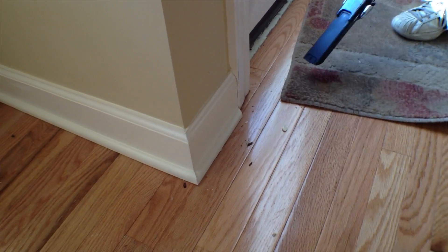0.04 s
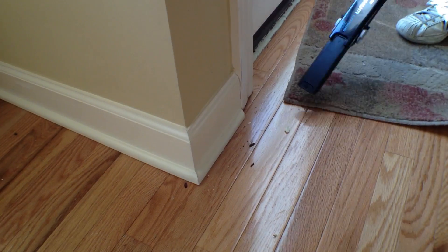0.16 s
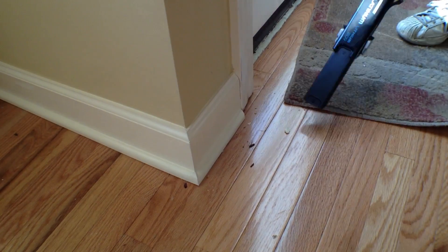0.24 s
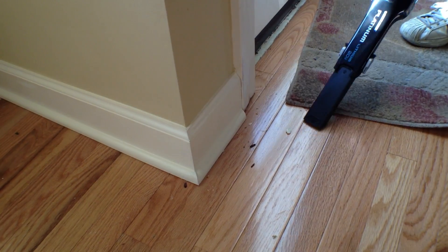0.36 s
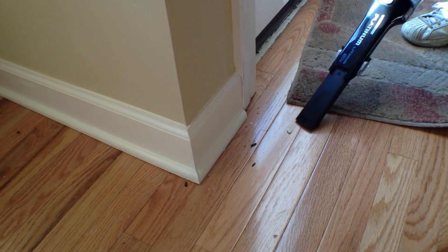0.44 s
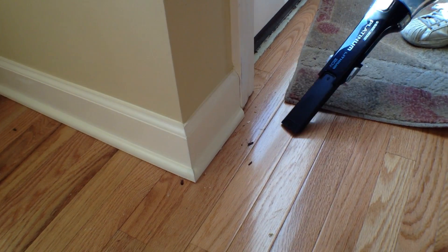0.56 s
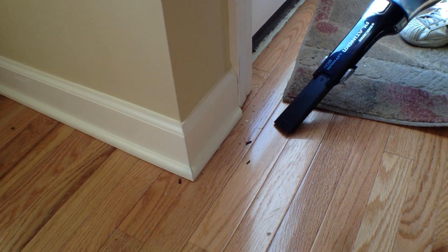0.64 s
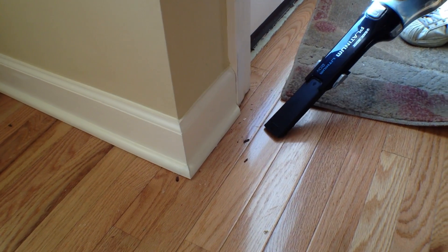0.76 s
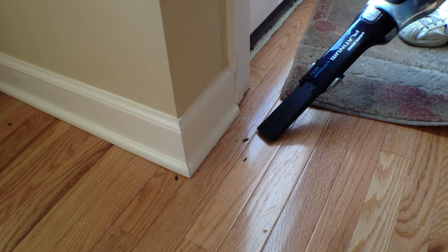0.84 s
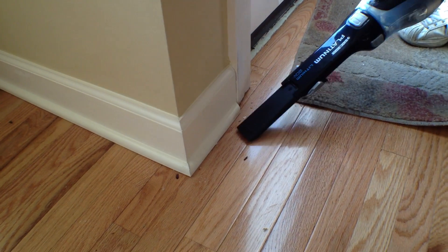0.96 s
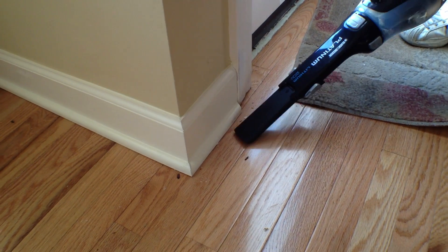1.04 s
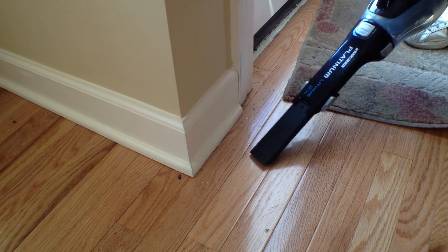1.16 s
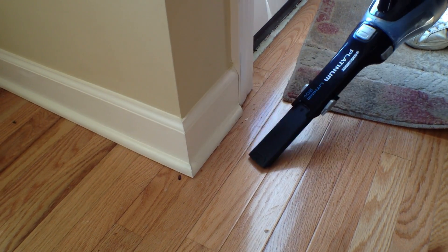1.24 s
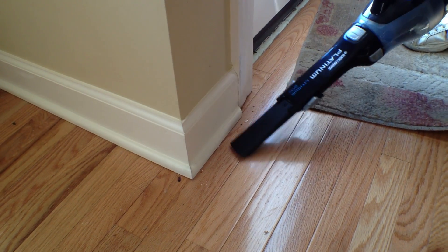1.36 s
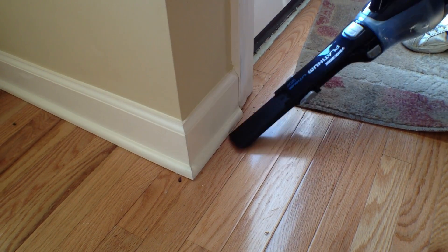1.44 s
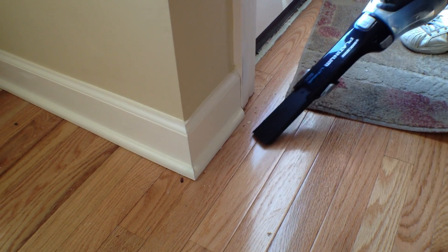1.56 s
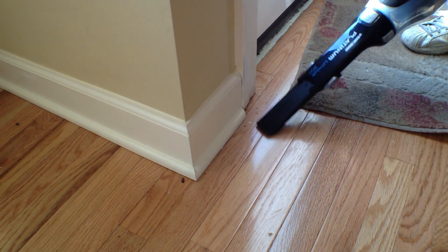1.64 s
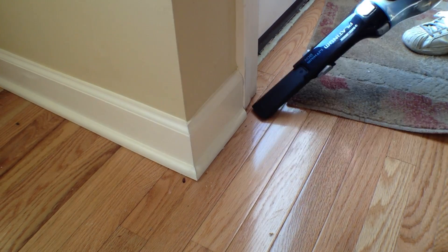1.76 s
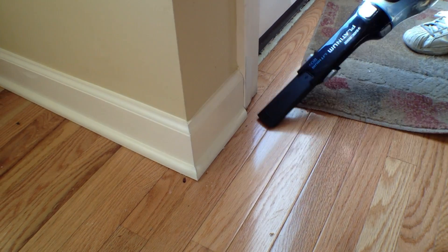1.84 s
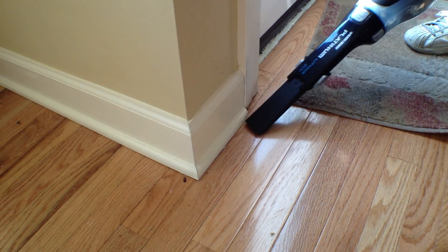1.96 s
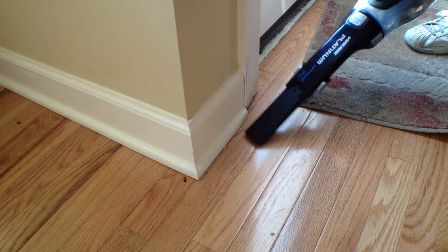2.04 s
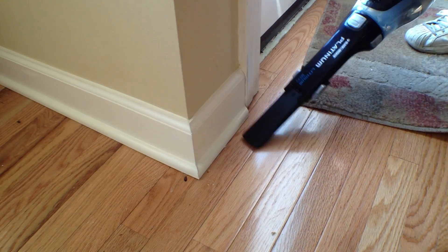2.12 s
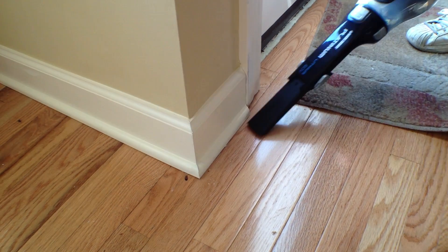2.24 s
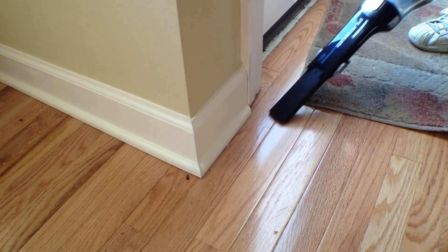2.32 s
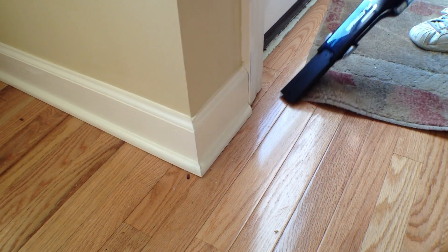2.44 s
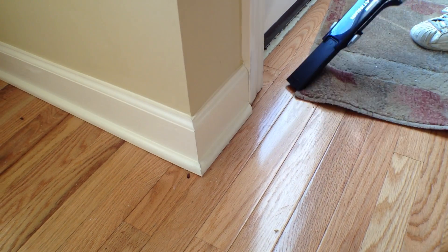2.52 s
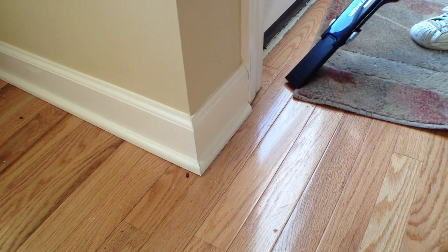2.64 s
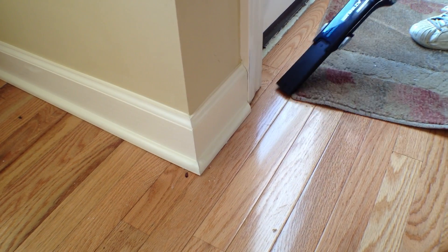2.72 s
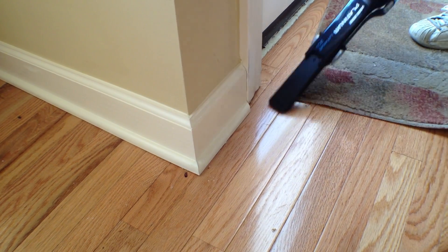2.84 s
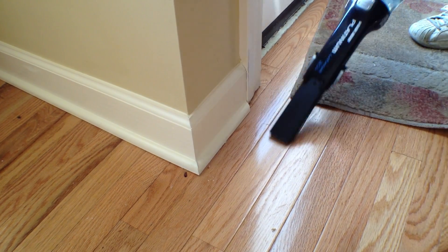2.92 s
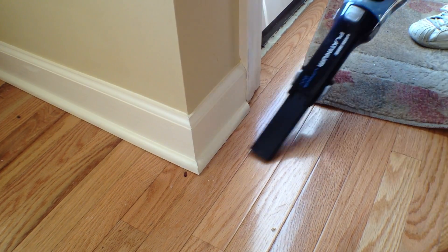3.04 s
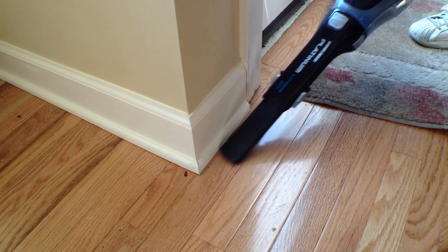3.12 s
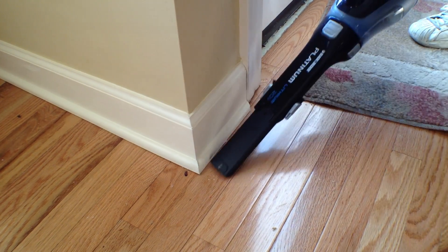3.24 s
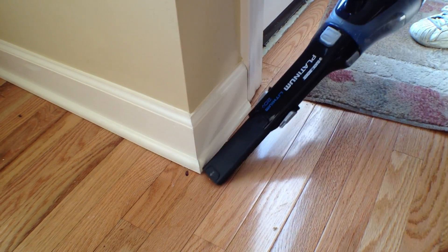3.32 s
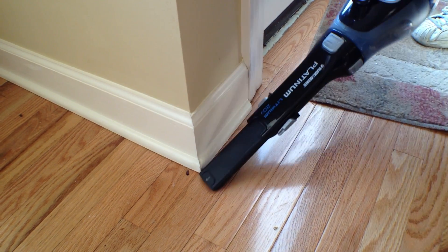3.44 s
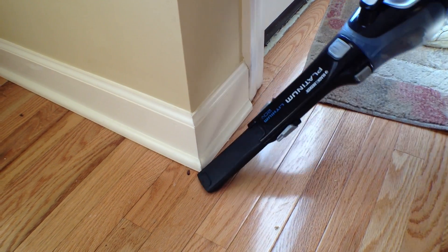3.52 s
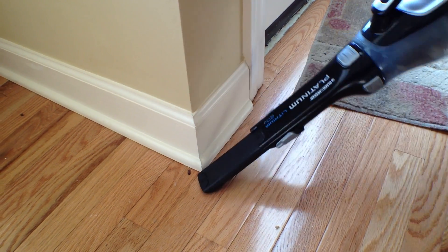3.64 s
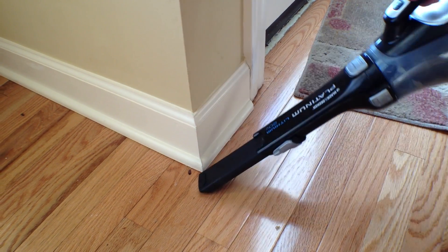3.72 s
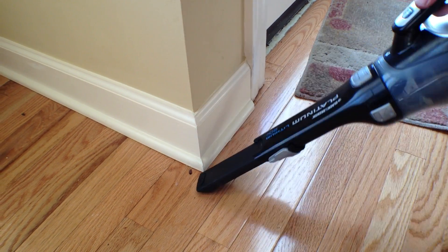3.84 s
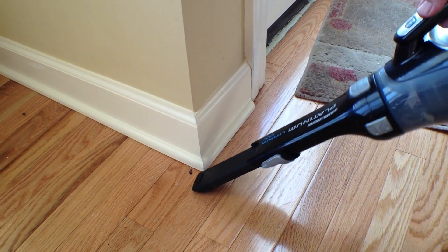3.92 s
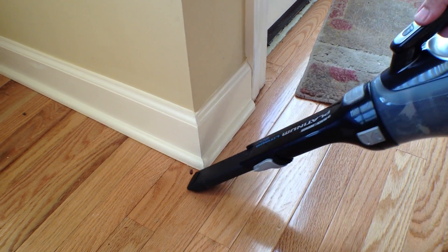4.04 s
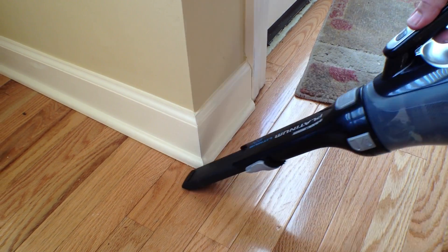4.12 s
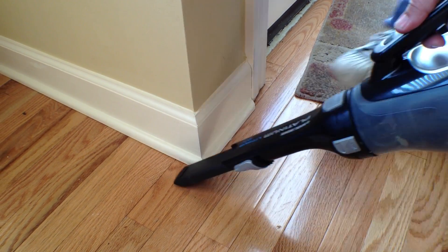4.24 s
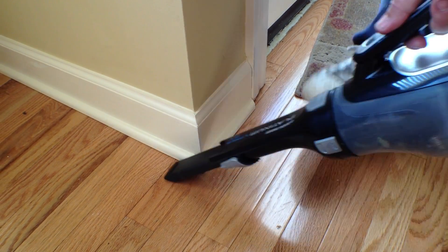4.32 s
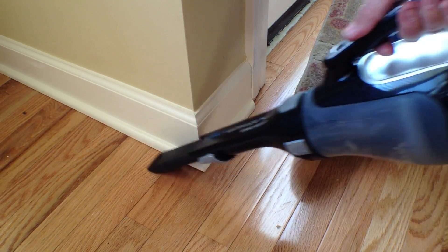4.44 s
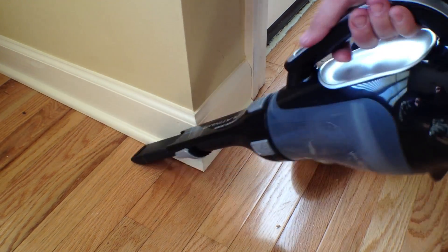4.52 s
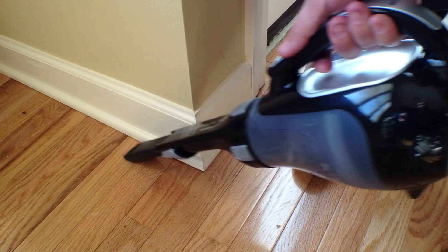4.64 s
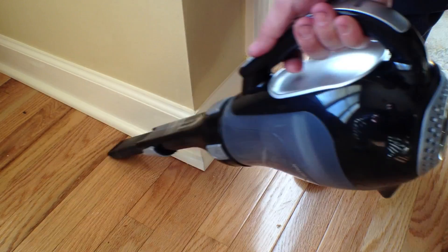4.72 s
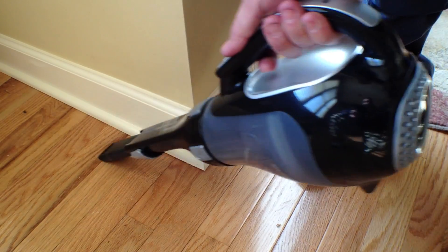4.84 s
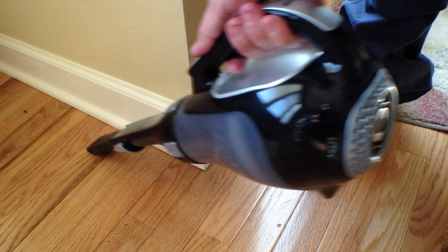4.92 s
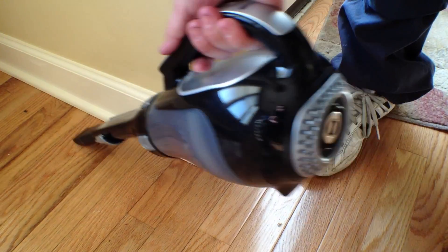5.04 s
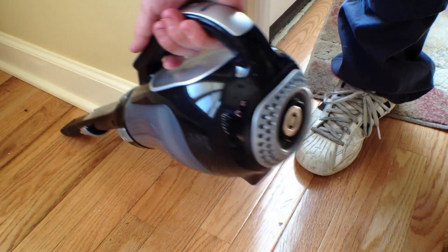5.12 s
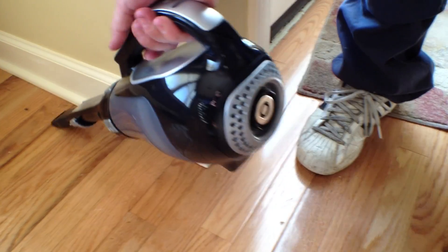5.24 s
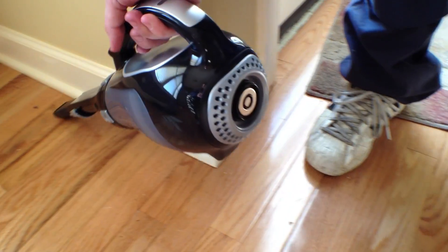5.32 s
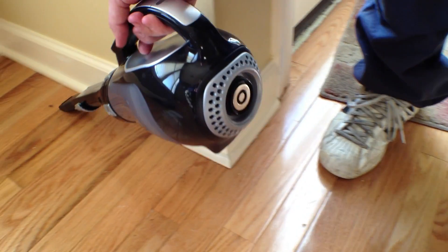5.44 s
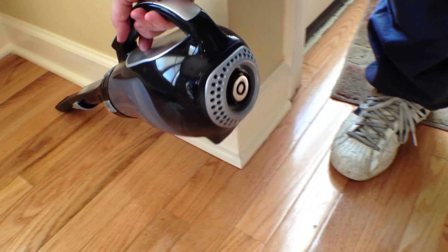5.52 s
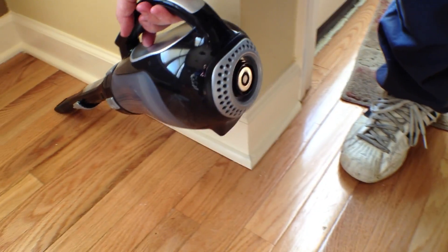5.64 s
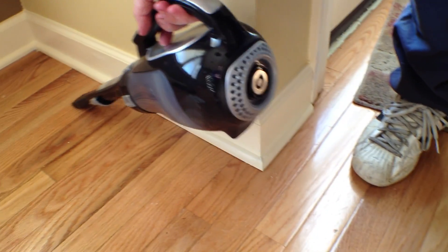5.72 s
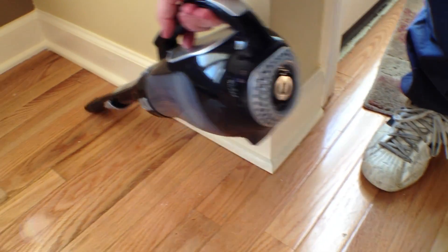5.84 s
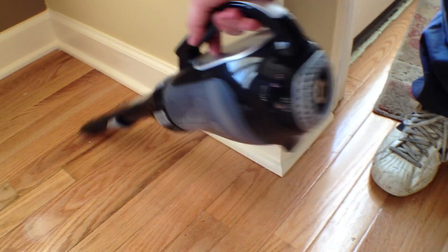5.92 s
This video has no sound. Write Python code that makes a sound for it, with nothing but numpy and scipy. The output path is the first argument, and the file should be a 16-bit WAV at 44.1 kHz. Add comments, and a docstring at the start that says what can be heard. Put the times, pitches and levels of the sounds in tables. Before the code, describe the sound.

Continuous small-vacuum noise indoors, heard by one fixed-sounding mono microphone. Turbulent air dominates, with a steady motor hum and a piercing whine that swells and fades in flutters. Early on come a soft knock and tiny ticks, then another knock. Later the machine approaches, getting louder, brighter and fuller, with one sharp clatter of grit up the nozzle and a lone tick near the end.

```python
"""A cordless hand vacuum is steered over a wooden floor, far from the microphone at first, then close and tail first.
Its motor hums and its nine-bladed fan whines: periodic tones locked to the shaft, shaken by unsteady air.
Air rushes through the housing and the exhaust slots: turbulent noise shaped by resonances and a floor echo.
Crumbs tick up the nozzle and ring its plastic; the nozzle now and then bumps the floor with a dull knock.
A steady low drone of the room lies beneath."""
import sys
import numpy as np
from scipy import signal
from scipy.fft import rfft, irfft
from scipy.io import wavfile
from scipy.ndimage import uniform_filter1d

SR = 44100
rng = np.random.default_rng(int(sys.argv[2]) if len(sys.argv) > 2 else 0)


def wrap_up_sound(samples):
    """Save the sound to the file named by the first command line argument, as 16-bit audio."""
    columns = np.atleast_2d(samples).T
    # keep every value between -1 and 1, then stretch to whole-number steps
    tamed = np.clip(columns, -1, 1)
    steps = np.round(tamed * 32767).astype(np.int16)
    wavfile.write(sys.argv[1], SR, steps)


N = 263277
T = np.arange(N) / SR
FRAME, HOP = 2048, 512  # short-time spectrum, samples
FRAME_S = np.arange(N // HOP + 5) * HOP / SR
BIN_HZ = np.fft.rfftfreq(FRAME, 1 / SR)

# pose of the machine; facing is how far the exhaust points at the microphone:
# time_s, closeness (0-1), facing (0-1), floor_echo_lag_ms, floor_echo_strength (0-1)
POSE = [(0, 0, 0, 0.9, 0.06), (.6, 0.11, 0.03, 0.71, .07), (1.2, 0.21, .14, 0.73, 0.07),
        (2, 0.07, 0.11, 0.81, 0), (2.7, 0.18, 0.05, 0.59, 0.4), (3.25, 0, 0, 0.75, 0),
        (3.6, 0.24, 0.17, 1.16, 0.3), (3.9, 0.53, 0, 1.6, 0.03), (4.3, 1, 0.38, 1.7, 0.3),
        (4.8, 0.7, 0.48, 1.83, 0.05), (5.2, 0.97, 0.97, 2.05, 0), (5.97, 0.91, 0.84, 1.6, 0.02)]
# rush of air at the microphone, before a common trim: time_s, level_db
RUSH_LEVEL = [(0, -51.5), (.3, -49), (1.2, -47), (2.2, -47.5), (2.7, -49), (3.3, -46.5), (4.5, -42),
              (5.3, -39.5), (5.97, -42)]


def amp(db):
    """Level law: decibels to an amplitude ratio."""
    return 10 ** (np.asarray(db) / 20)


def evened(x):
    """Power normalization: scales to rms 1."""
    return x / np.sqrt(np.mean(x ** 2) + 1e-20)


def follow(rows, t):
    """Linear interpolation in time: the columns of a curve table at the times t."""
    s, *columns = np.transpose(rows)
    return [np.interp(t, s, c) for c in columns]


def read(points, hz):
    """Interpolation on a logarithmic frequency axis: the levels of a spectrum table at hz."""
    f, db = np.transpose(points)
    return np.interp(np.log(hz + 1), np.log(f + 1), db)


def add(mix, s, sound):
    """Superposition: mixes a sound in at time s."""
    part = mix[round(s * SR):][:len(sound)]
    part += sound[:len(part)]


def wander(rate_hz):
    """Low-pass random fluctuation of rms 1, mostly slower than the rate."""
    hz = np.fft.rfftfreq(N, 1 / SR)
    spectrum = rfft(rng.standard_normal(N)) / (1 + (hz / rate_hz) ** 2)
    return evened(irfft(spectrum, N))


def sway(rate_hz):
    """Band-pass random fluctuation of rms 1 at about the rate, with slow drift suppressed."""
    u = np.fft.rfftfreq(N, 1 / SR) / rate_hz
    spectrum = rfft(rng.standard_normal(N)) * u ** 2 / (1 + u ** 4)
    return evened(irfft(spectrum, N))


def noise(gain):
    """Time-varying filtering: noise of rms 1 whose short-time spectrum follows gain (frames x bins)."""
    a, b = rng.standard_normal((2, len(FRAME_S), len(BIN_HZ)))
    spectrum = ((a + 1j * b) * gain).T
    return evened(signal.istft(spectrum, nperseg=FRAME, noverlap=FRAME - HOP)[1][:N])


def patches(size):
    """Local averaging: random values of rms 1 correlated over patches of size (frames, bins)."""
    z = rng.standard_normal((len(FRAME_S), len(BIN_HZ)))
    along_time = uniform_filter1d(z, size[0], axis=0)
    return evened(uniform_filter1d(along_time, size[1], axis=1))


def grain(eddy_db, ripple_db):
    """Brief wide eddies, and narrow ridges from the room's standing waves that shift as the machine moves."""
    eddies = eddy_db * patches(size=(6, 16))
    ripples = ripple_db * patches(size=(45, 2))
    return amp(eddies + ripples)


def bell(hz, width):
    """Resonance curve: 1 at its centre, a half at the edges of its width."""
    return 1 / (1 + (2 * (BIN_HZ - hz) / width) ** 2)


def posed(far_db, close_db, facing_db):
    """Distance and directivity: the level of a part as it comes closer and turns its tail to the microphone."""
    close, facing = follow(POSE, T)[:2]
    return far_db + close_db * close + facing_db * facing


def room():
    """Stationary coloured noise: a low drone that does not change with the vacuum's distance."""
    # colour of the drone, before levelling: frequency_hz, relative_db
    drone = [(25, -48), (60, -42), (85, -30), (120, -14.5), (155, -1.5), (195, 3), (225, -1), (270, 3),
             (320, -15.5), (390, -1), (600, -4), (2000, -50)]
    level_db = -63  # rms
    hz = np.fft.rfftfreq(N, 1 / SR)
    spectrum = rfft(rng.standard_normal(N)) * amp(read(drone, hz))
    return amp(level_db) * evened(irfft(spectrum, N))


def bumps():
    """Impact: a short, dull band-limited knock of plastic on boards with a brief scatter of reflections."""
    # nozzle bumping the floor: start_s, peak_db, pitch_hz
    knocks = [(.411, -41, 965), (0.42, -48, 220), (2.212, -39, 690), (4.556, -45.5, 219), (4.585, -48, 206)]
    out, t = np.zeros(N), np.arange(SR // 4) / SR
    for s, peak_db, hz in knocks:
        push = 0.012 * rng.standard_normal(len(t)) * amp(-60 * t / 0.15)  # scatter, t60 0.15 s
        push[0] = 1  # the blow itself
        band = signal.butter(3, [hz / 1.45, hz * 1.45], "band", fs=SR, output="sos")
        knock = signal.sosfilt(band, push)
        add(out, s, amp(peak_db) * knock / abs(knock).max())
    return out


def crumbs():
    """Impact and modal ringing: each crumb cracks on the wall, rings the nozzle and skitters on, without bass."""
    # crumbs striking the inside of the nozzle: start_s, strike_level_db
    strikes = [(.627, -35.5), (.639, -41), (.661, -42), (1.840, -38.5), (4.588, -34), (4.596, -29),
               (4.6056, -21), (4.610, -27.5), (4.620, -35), (5.1204, -33)]
    # ring of the plastic nozzle, each pitch raised at random by up to 4 %: frequency_hz, level_db, t60_s
    plastic = [(1420, -8, .015), (3030, -5, 0.025), (7600, 4, 0.023), (8670, 5.5, 0.0098),
               (9260, -15, 0.0095), (10800, 10, 0.0047), (11000, -7, 0.0034), (12300, -8, .007),
               (14200, -23, .006)]
    out, t = np.zeros(N), np.arange(SR // 8) / SR
    soften = signal.butter(1, 8000, "low", fs=SR, output="sos")
    for s, strike_db in strikes:
        ring = np.zeros(len(t))
        for hz, db, t60 in plastic:
            cycles = hz * rng.uniform(1.0, 1.04) * t + rng.random()
            ring += amp(db - 60 * t / t60) * np.sin(2 * np.pi * cycles)
        crack = signal.sosfilt(soften, rng.standard_normal(len(t)) * amp(-60 * t / .016))
        blow = .85 * ring / abs(ring).max() + .6 * crack / abs(crack).max()
        struck = rng.random(len(t)) < 1500 / SR  # about 1500 small hits a second, dying away
        hits = .1 * rng.standard_normal(len(t)) * struck * amp(-60 * t / .13)
        hits[0] = 1  # the first strike
        add(out, s, amp(strike_db) * signal.fftconvolve(hits, blow)[:len(t)])
    # so small a blow radiates no bass
    return signal.sosfilt(signal.butter(3, 550, "high", fs=SR, output="sos"), out)


def jets():
    """Jet noise: air leaving the slots makes a fuzzy, fluttering whistle, higher on axis, that sways with the hand."""
    # resonances of the exhaust slots, off axis: frequency_hz, width_hz, level_db
    slots = [(6626, 530, -2.5), (7300, 670, -11)]
    shift_hz = 190 * follow(POSE, FRAME_S[:, None])[1]
    power = sum((amp(db) * bell(hz + shift_hz, width)) ** 2 for hz, width, db in slots)
    swirl = wander(rate_hz=60)
    flutter_db = 1.4 * (swirl - uniform_filter1d(swirl, size=4000))  # quick flutter about a steady mean
    sway_db = 1.25 * sway(rate_hz=2.5)
    level_db = posed(far_db=-56, close_db=15, facing_db=-5.5) + flutter_db + sway_db
    return amp(level_db) * noise(np.sqrt(power) * grain(eddy_db=1.0, ripple_db=4.0))


def airflow():
    """Turbulence and interference: housing and nozzle colour the air noise; the floor echo sweeps a comb through it."""
    # colour of the rush from afar, before levelling: frequency_hz, relative_db
    far_colour = [(100, -49), (300, -9.5), (540, -5), (720, -8.5), (880, -5), (1150, -7), (1750, -3.5),
                  (2150, -5.5), (2800, -2.5), (4200, 1.5), (5100, -5.5), (8400, -5), (9400, -15),
                  (15000, -18.5)]
    # what full closeness adds: frequency_hz, change_db
    close_colour = [(200, -3), (400, -15.5), (700, 7.5), (1400, 1.5), (2000, 0), (4000, -0.5), (5700, 6),
                    (8000, -1.5), (9600, 2.5), (12500, 6), (15000, -6)]
    # what fully facing the exhaust adds: frequency_hz, change_db
    facing_colour = [(300, 9.5), (1280, -3.5), (1530, 5), (1900, -0.5), (3000, 6.5), (4000, 8), (5200, -2),
                     (6200, -1), (7000, 14.5), (8300, 10), (9500, 2), (10700, 8.5), (12800, 10),
                     (14000, 4.5)]
    # air resonances of the housing: frequency_hz, width_hz, rise_db
    duct = [(1215, 81, 5), (1410, 390, 3), (1580, 150, 1), (2930, 410, 3), (3680, 100, -0.5),
            (4000, 130, 1)]
    # the nozzle is a quarter-wave pipe that sings when its mouth nearly touches: time_s, floor_nearness (0-1)
    mouth = [(0, 0.8), (.85, 0.1), (1.1, 1), (1.7, 0.6), (2, 0.6), (2.7, 0.24), (3.65, 0.82), (5, 0.63)]
    # its modes: multiple_of_lowest_resonance, width_hz, rise_db at full nearness
    pipe = [(1.02, 120, 6.5), (3, 228, 6)]
    close, facing, lag_ms, echo = follow(POSE, FRAME_S[:, None])
    touch = follow(mouth, FRAME_S[:, None])[0]
    pipe_hz = 1072 - 65 * touch  # nominal lowest resonance: free air, less the lowering by the floor
    db = read(far_colour, BIN_HZ) + close * read(close_colour, BIN_HZ) + facing * read(facing_colour, BIN_HZ)
    db += sum(rise * bell(hz, width) for hz, width, rise in duct)
    db += touch * sum(rise * bell(k * pipe_hz, width) for k, width, rise in pipe)
    mirrored = np.exp(-2j * np.pi * BIN_HZ * lag_ms / 1000)
    blur_hz = 2600  # the machine is too wide for a sharp comb in the treble
    gain = amp(db) * abs(1 + echo * mirrored / (1 + (BIN_HZ / blur_hz) ** 4))
    # the level curve governs the band from 550 to 4000 Hz
    body = (BIN_HZ > 550) & (BIN_HZ < 4000)
    rush = amp(follow(RUSH_LEVEL, FRAME_S[:, None])[0])
    gain *= rush / np.linalg.norm(gain[:, body], axis=1, keepdims=True)
    level = np.sqrt(np.mean(np.sum(gain ** 2, axis=1)))
    return amp(-1.1) * level * noise(gain * grain(eddy_db=1.0, ripple_db=3.0))


def tone(phase, db, rough, rate_hz, order=1):
    """Random modulation: a multiple of a rotor's turning at level db, shaken in size and phase by unsteady air."""
    shake = rough * (wander(rate_hz) + 1j * wander(rate_hz))
    turning = np.exp(1j * (order * phase + 2 * np.pi * rng.random()))
    return np.sqrt(2) * amp(db) * ((1 + shake) * turning).real  # root 2: from rms to peak


def motor():
    """Rotor harmonics: the shaft hums; blades pass nine times a turn and whine, fluttering as the hand moves."""
    # mean motor speed: time_s, turns_per_s
    speed_curve = [(0, 468), (.4, 467.6), (.75, 468.7), (1.6, 469.6), (2.9, 469.6), (3.4, 470.3),
                   (4.9, 470.7), (5.4, 469.9), (5.97, 469.4)]
    # shaft hum, which jumps up as the motor housing comes near, before its sway: time_s, level_db
    hum = [(0, -61), (1.2, -61), (2.5, -60.5), (3.7, -66), (3.92, -55.5), (4.5, -49.5), (4.65, -55),
           (4.85, -48), (5.5, -52.5), (5.97, -52.5)]
    # whine swelling and fading through the room's standing waves, before lift and sway: time_s, level_db
    whine = [(0.0, -52), (0.05, -57.5), (0.25, -45), (0.32, -63), (0.38, -47.5), (0.96, -55.5), (1.0, -50),
             (1.78, -47), (1.84, -59), (2.03, -46.5), (2.21, -64.5), (2.39, -47.5), (2.61, -57),
             (3.13, -44.5), (3.26, -62), (3.36, -43.5), (3.82, -56.5), (3.87, -41.5), (3.94, -55),
             (3.99, -44), (4.06, -53.5), (4.26, -45), (4.36, -60.5), (4.51, -40.5), (4.65, -54.5),
             (4.96, -36), (5.07, -49), (5.14, -41), (5.55, -39.5), (5.6, -49), (5.7, -38), (5.97, -47)]
    # weak shaft orders: multiple_of_speed, db_relative_to_rush_level
    orders = [(2, -31), (7, -18.5), (10, -24), (14, -24)]
    blades = 9
    speed = follow(speed_curve, T)[0] + 0.088 * wander(rate_hz=15)
    shaft = 2 * np.pi * np.cumsum(speed) / SR
    blade = blades * shaft
    rush_db = follow(RUSH_LEVEL, T)[0]
    hum_db = follow(hum, T)[0] + 0.72 * sway(rate_hz=3)
    whine_db = follow(whine, T)[0] + 1.29 * sway(rate_hz=7) + 2.0
    octave_db = posed(far_db=-65, close_db=9.5, facing_db=6.5)
    out = tone(shaft, hum_db, rough=0.11, rate_hz=12)
    out += tone(blade, whine_db, rough=0.18, rate_hz=16)
    out += tone(blade, octave_db, rough=0.56, rate_hz=9.1, order=2)
    # third multiples of shaft and whine fill the room evenly
    out += tone(shaft, -63, rough=0.36, rate_hz=7.5, order=3)
    out += tone(blade, -76, rough=.6, rate_hz=3.1, order=3)
    for k, db in orders:
        out += tone(shaft, rush_db + db, rough=0.52, rate_hz=7, order=round(k))
    return out


def scene():
    """Superposition: all sources reach one microphone, which feeds both channels."""
    mono = room() + bumps() + crumbs() + jets() + airflow() + motor()
    return np.array([mono, mono])


def record(dry):
    """Band limitation: the recorder passes only what lies below its upper edge."""
    edge_hz = 15350
    low_pass = signal.firwin(511, edge_hz, window=("kaiser", 9), fs=SR)
    return signal.oaconvolve(dry, low_pass[None], "same")


dry = scene()
out = record(dry)
wrap_up_sound(out)
```